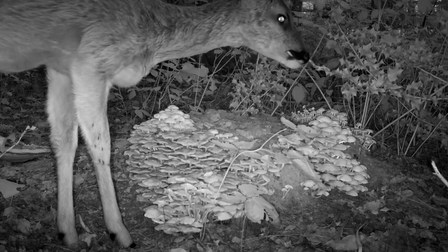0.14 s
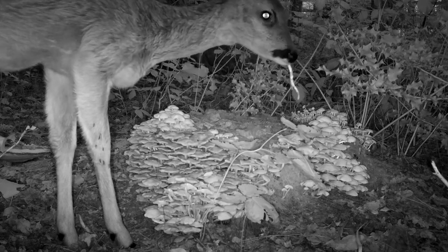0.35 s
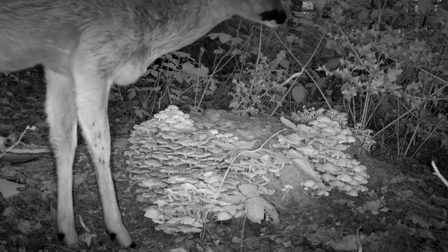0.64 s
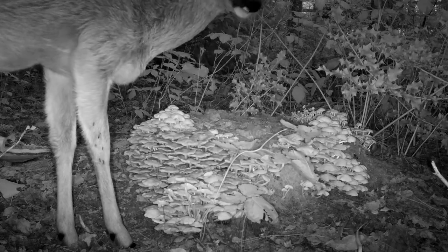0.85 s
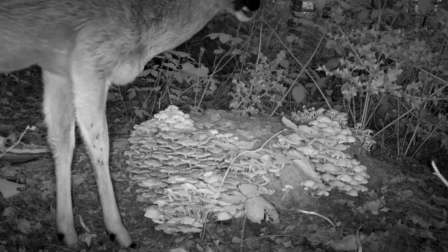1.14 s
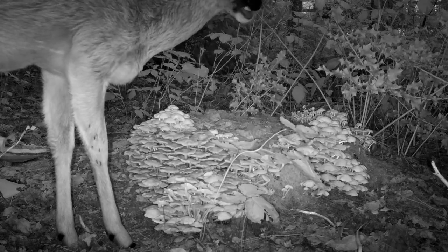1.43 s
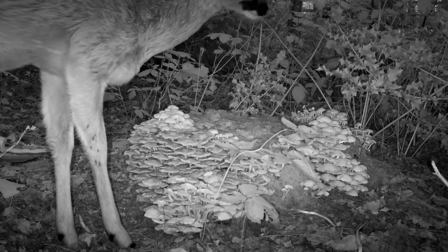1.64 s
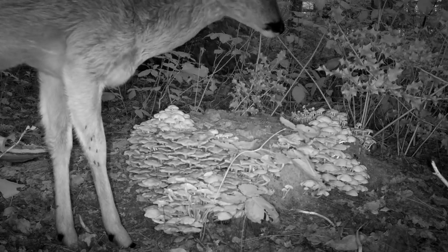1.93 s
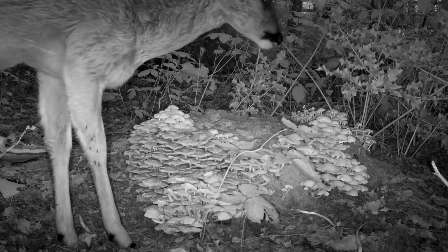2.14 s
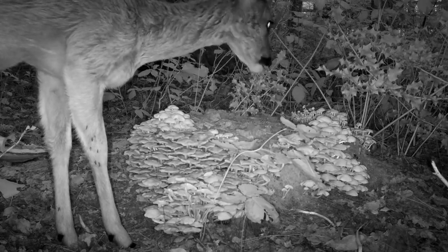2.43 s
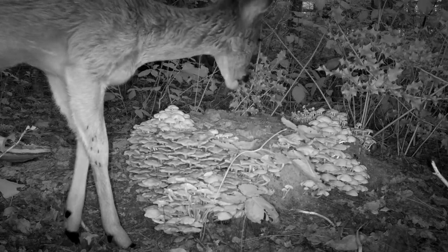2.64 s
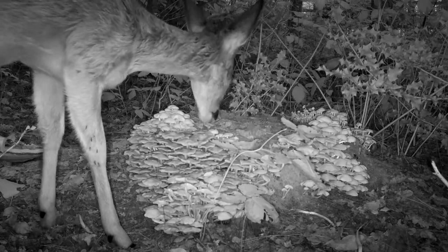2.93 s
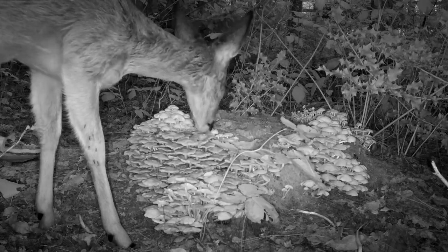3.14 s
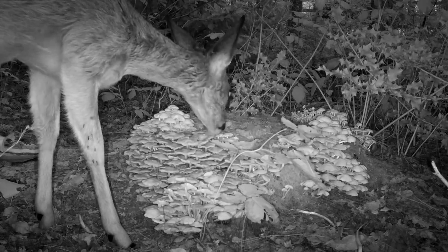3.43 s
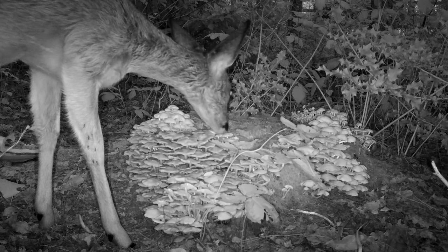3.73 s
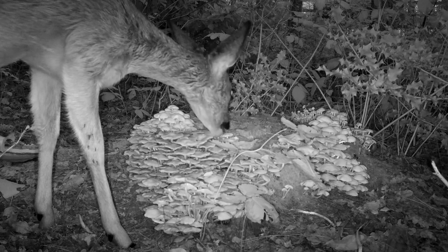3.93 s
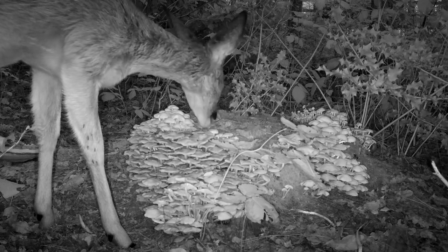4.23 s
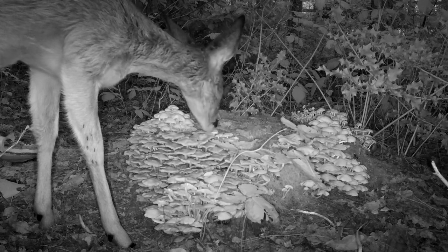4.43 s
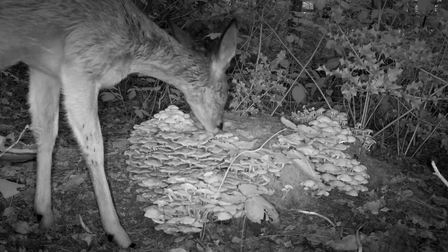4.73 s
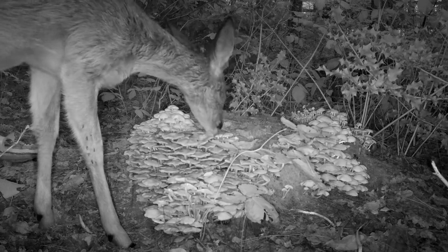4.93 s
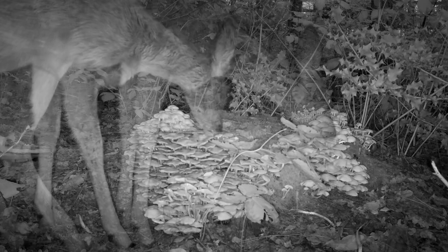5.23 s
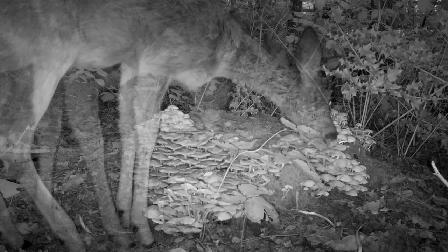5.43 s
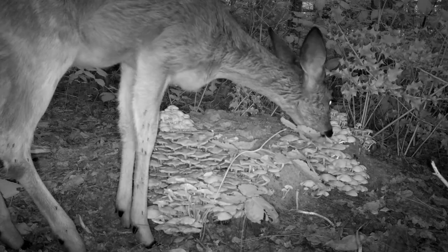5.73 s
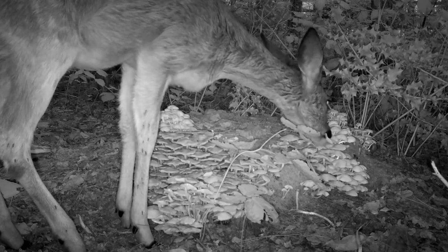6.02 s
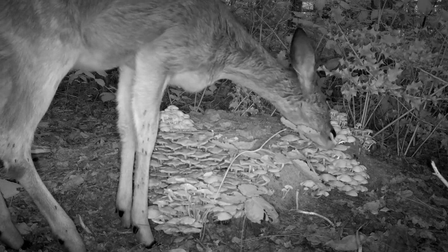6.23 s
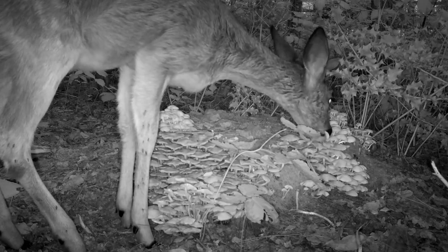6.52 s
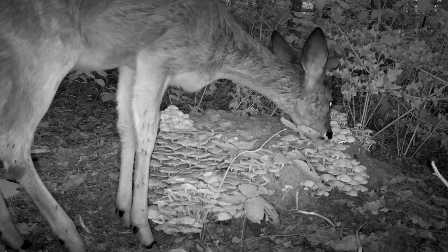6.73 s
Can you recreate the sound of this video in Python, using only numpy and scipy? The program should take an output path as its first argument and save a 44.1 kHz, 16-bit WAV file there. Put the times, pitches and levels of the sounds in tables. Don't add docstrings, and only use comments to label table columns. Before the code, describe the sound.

Through a thin, nasal trail-camera microphone, a close bird rattles off quick falling chirps, with another bird's rough buzzing whistle and leaf rustle at the start. They fade by about a second into steady woodland hiss. A deer's muzzle cracks dry stems in a sharp cluster, far birds warble with echo, the hiss turns duller as the scene changes, and one more cluster of snaps comes near the end.

```python
import sys
import numpy as np
from scipy import signal
from scipy.io import wavfile
from scipy.ndimage import uniform_filter1d

SR = 44100
rng = np.random.default_rng(int(sys.argv[2]) if len(sys.argv) > 2 else 0)


def field_ratio(decibels):
    return 10 ** (np.asarray(decibels, dtype=float) / 20)


def waveform_to_disk(signal):
    frames = np.transpose(np.atleast_2d(signal))
    scaled = np.clip(frames, -1, 1) * 32767
    samples = np.round(scaled).astype(np.int16)
    wavfile.write(sys.argv[1], SR, samples)


N = 302526
TIME = np.arange(N) / SR

# freq_hz, density_db
DRY_CRACKLE = [(7600, -38), (9000, -4), (10200, -1), (11300, -5.5), (12300, -15.5), (15700, -20.5)]


def evened(x):
    return x / np.sqrt(np.mean(x ** 2) + 1e-20)


def read(points, hz):
    point_hz, level_db = np.transpose(points)
    return np.interp(np.log(hz + 1), np.log(point_hz + 1), level_db, left=-90, right=-90)


def follow(tables, column=1):
    rows = np.concatenate(tables)
    return np.interp(TIME, rows[:, 0], rows[:, column])


def add(mix, start_s, sound):
    part = mix[round(start_s * SR):][:len(sound)]
    part += sound[:len(part)]


def colour(x, points):
    log_gain = np.log(field_ratio(read(points, abs(np.fft.fftfreq(4096, 1 / SR)))))
    taps = np.fft.ifft(np.exp(np.conj(signal.hilbert(log_gain)))).real[:2048]
    return signal.oaconvolve(x, taps / np.linalg.norm(taps))[:len(x)]


def patchy(points, patchy_db, streak_db=0):
    real, imag, patches, streaks = rng.standard_normal((N // 256 + 5, 513, 4)).T
    patches = uniform_filter1d(patches, size=12, axis=0)
    patches = evened(uniform_filter1d(patches, size=12, axis=1))
    streaks = uniform_filter1d(streaks, size=2, axis=0)
    streaks = evened(uniform_filter1d(streaks, size=14, axis=1))
    spectrum_db = read(points, np.fft.rfftfreq(1024, 1 / SR))[:, None]
    field_db = spectrum_db + patchy_db * patches + streak_db * streaks
    noise = signal.istft((real + 1j * imag) * field_ratio(field_db), nperseg=1024, noverlap=768)[1]
    return evened(noise[:N])


def grains(points, per_s, spread_db):
    ticks = rng.standard_normal(N) * (rng.random(N) < per_s / SR)
    size_db = spread_db * np.minimum(rng.exponential(1, N), 4)
    return evened(colour(ticks * field_ratio(size_db), points))


def wood(x, near_db, far_db):
    # freq_hz, t60_s
    decay = [(1000, 0.68), (2500, 0.3), (4400, 0.26), (6500, 0.32)]
    hz, t, z = signal.stft(rng.standard_normal(SR), SR, nperseg=256)
    decay_hz, t60_s = np.transpose(decay)
    fade = field_ratio(-60 * t / np.interp(hz, decay_hz, t60_s)[:, None])
    tail = signal.istft(z * fade, SR, nperseg=256)[1]
    tail[:300] = 0
    early = rng.standard_normal(1500) * (rng.random(1500) < .02)
    early = early * field_ratio(-60 * np.arange(1500) / SR / 0.11)
    echoes = field_ratio(far_db) * tail / np.linalg.norm(tail)
    echoes[40:1540] += field_ratio(near_db) * early / np.linalg.norm(early)
    return x + signal.fftconvolve(x, echoes)[:N]


def sing(notes, rough, flutter_hz):
    out = np.zeros(N)
    for rows in notes:
        point_s, pitch_hz, level_db = np.transpose(rows)
        t = np.arange(point_s[0], point_s[-1], 1 / SR)
        smooth = signal.butter(2, flutter_hz, fs=SR, output="sos")
        a, b = signal.sosfilt(smooth, rng.standard_normal((2, 8000)))[:, 1000:]
        flutter = (1 + rough * (evened(a) + 1j * evened(b)))[:len(t)]
        turn = 2 * np.pi * np.cumsum(np.interp(t, point_s, pitch_hz)) / SR
        tone = evened((flutter * np.exp(1j * turn)).real)
        edges = np.clip(np.minimum(t - point_s[0], point_s[-1] - t) / .0015, 0, 1)
        add(out, point_s[0], field_ratio(np.interp(t, point_s, level_db)) * tone * edges)
    return out


def camera():
    # time_s, peak_db
    whine_level = [(0, -68.5), (4.8, -71.5), (5.1, -82.5), (5.5, -83), (6.86, -81.5)]
    # freq_hz, density_db
    low_noise = [(12, -34), (20, -3), (55, -0.5), (171, -1.5), (370, -21.5), (526, -24), (643, -16.5),
                 (900, -14), (1100, -15.5), (1430, -38.5), (2420, -120)]
    # freq_hz, density_db
    air_noise = [(4000, -20.5), (6000, 3.5), (7200, 0.5), (8600, -1.5), (10500, 0), (13000, 1), (15700, 3)]
    whine_hz, frame_hz, frame_s = 7796.24, 29.757, 1.4015
    phase = (TIME - frame_s) * frame_hz % 1
    half = 2 * phase % 1
    field = np.where(phase < .5, 1, -.6) * field_ratio(-3.0 * half)
    whine = uniform_filter1d(field, size=60) * np.cos(2 * np.pi * whine_hz * TIME - 0.6 * half)
    overtone = field_ratio(-101) * np.cos(4 * np.pi * whine_hz * TIME)
    lines = field_ratio(follow([whine_level])) * whine + overtone
    noise = field_ratio(-74.5) * patchy(low_noise, 1.5) + field_ratio(-87.5) * patchy(air_noise, 0.86, 2.5)
    hum = patchy([(40, -20), (50, -3), (60, 0), (68, -25)], 1.2)
    return lines + field_ratio(-81.5) * hum + noise


def hiss():
    # time_s, level_db
    hiss_level = [
        [(1.1, -53), (1.2, -54.5), (1.8, -55.5), (3.32, -54), (3.83, -55.5), (4.24, -55.5), (4.64, -57),
         (4.82, -56)],
        [(4.83, -66), (5.07, -60), (5.27, -58.5), (6.62, -58.5), (6.74, -58), (6.86, -64.5)],
    ]
    # freq_hz, density_db
    clear_spectrum = [(290, -83.5), (500, -49.5), (635, -21), (806, -26), (1230, -3.5), (1790, 2),
                      (2830, -2), (3870, -11), (4480, -16.5), (4870, -19), (5990, -29), (7790, -74),
                      (13200, -120)]
    # freq_hz, density_db
    dull_spectrum = [(290, -76), (500, -59.5), (1330, -13.5), (1490, -11), (1720, -8.5), (2210, -7.5),
                     (2640, -12), (4970, -28), (5990, -39.5), (7790, -71), (13200, -120)]
    change_s = 4.822
    before, after = patchy(clear_spectrum, 1.5, 0.72), patchy(dull_spectrum, 2.04, 3.9)
    return field_ratio(follow(hiss_level) + 1.0) * np.where(TIME < change_s, before, after)


def far_birds():
    # time_s, pitch_hz, level_db
    high_notes = [
        [(3.69, 3660, -61), (3.72, 3610, -57), (3.745, 3820, -55), (3.765, 4320, -66), (3.78, 4350, -60)],
        [(3.718, 2650, -60), (3.725, 2960, -54), (3.732, 3250, -61)],
        [(3.9, 3590, -53), (3.915, 4030, -58), (3.948, 3976, -49), (3.958, 3750, -46.5), (3.99, 4070, -69)],
        [(4.115, 3570, -59), (4.138, 3600, -46.5), (4.148, 3590, -54), (4.156, 3260, -50)],
        [(4.174, 4000, -44), (4.179, 3794, -35), (4.187, 3806, -34), (4.193, 4020, -48.5)],
        [(4.194, 3460, -44), (4.2, 3780, -46), (4.209, 3880, -44), (4.228, 3890, -52)],
        [(4.232, 4050, -38.5), (4.238, 3440, -35.5), (4.25, 3420, -44), (4.263, 3410, -45)],
        [(4.265, 4050, -46), (4.278, 3655, -52), (4.29, 3310, -37)],
        [(6.74, 3720, -66), (6.76, 3650, -64), (6.8, 3720, -69)],
        [(1.195, 3470, -53), (1.22, 3520, -67), (1.232, 3660, -47.5), (1.242, 3400, -53)],
    ]
    # time_s, pitch_hz, level_db
    low_notes = [
        [(4.285, 3300, -48.5), (4.293, 3317, -37), (4.321, 3055, -54.5), (4.33, 3157, -59)],
        [(4.33, 3290, -45), (4.34, 2965, -42.5), (4.385, 2880, -62)],
    ]
    # time_s, pitch_hz, level_db
    churr_notes = [
        [(4.248, 2600, -67), (4.256, 2590, -46.5), (4.266, 2559, -53), (4.275, 2555, -66)],
        [(4.298, 2476, -47.5), (4.31, 2470, -49), (4.322, 2472, -61)],
        [(4.355, 2588, -51), (4.367, 2558, -59), (4.399, 2632, -64), (4.429, 2546, -57.5), (4.475, 2664, -60)],
    ]
    # time_s, pitch_hz, level_db
    thin_notes = [
        [(3.36, 7130, -86), (3.42, 7120, -82), (3.465, 7130, -86)],
        [(3.65, 7150, -86), (3.7, 7170, -82), (3.755, 7100, -87)],
        [(3.885, 7130, -86), (3.95, 7100, -77), (3.99, 7080, -85)],
    ]
    warbles = sing(high_notes + low_notes + churr_notes, .35, 190)
    return wood(warbles + sing(thin_notes, 0.24, 60), -20.5, -4)


def leaves():
    # time_s, rustle_db, crackle_db
    motion = [
        [(0.03, -31.5, -69), (0.118, -64, -68.5), (0.132, -28, -73), (0.162, -51.5, -69), (0.238, -41, -80),
         (0.254, -40, -68.5), (0.278, -47, -76), (0.488, -61, -84.5), (0.55, -45, -72), (0.588, -71, -84),
         (0.596, -76, -84), (1.0, -67, -87)],
        [(1.02, -67, -86), (1.23, -70, -88.5), (1.27, -62.5, -76), (1.34, -64.5, -88), (1.52, -80, -101),
         (1.66, -69, -82), (1.67, -57.5, -108), (1.69, -68, -90), (1.93, -71, -101), (1.94, -63.5, -109),
         (2.07, -68, -93), (2.12, -66, -109), (2.15, -68, -94), (2.37, -72, -95), (2.39, -74, -109),
         (2.46, -90, -90), (2.57, -67, -109), (2.62, -76, -91), (2.73, -81, -96), (2.85, -49.5, -70),
         (2.87, -68, -81), (3.02, -84, -102), (3.09, -36.5, -65), (3.12, -54, -91), (3.24, -75, -87),
         (3.41, -78, -94), (3.46, -82, -109), (3.49, -75, -98), (3.93, -87, -99), (3.99, -64, -108),
         (4.03, -57, -90), (4.09, -64, -87), (4.38, -72, -87), (4.58, -76, -100), (4.66, -59.5, -79),
         (4.69, -56.5, -74), (4.74, -58.5, -80), (4.82, -69, -92)],
        [(4.83, -83, -102), (5.02, -92, -108), (5.1, -64, -94), (5.34, -94, -99), (5.37, -66, -89),
         (5.44, -68.5, -108), (5.45, -82, -103), (5.9, -79, -102), (5.94, -69, -91), (6.03, -96, -99),
         (6.24, -80.5, -93), (6.35, -97, -109), (6.43, -76, -92), (6.48, -75, -100), (6.54, -58, -80),
         (6.56, -58, -88), (6.59, -52, -82), (6.59, -66, -81), (6.6, -35, -84), (6.63, -74, -95),
         (6.77, -67.5, -97), (6.86, -87, -102)],
    ]
    # freq_hz, density_db
    rustle_spectrum = [(1500, -12), (2800, -15.5), (4200, -2.5), (5300, -5.5), (6500, -24.5), (7800, -27.5)]
    rustle = field_ratio(follow(motion) - 1.5) * grains(rustle_spectrum, 6800, 2.9)
    return rustle + field_ratio(follow(motion, column=2)) * grains(DRY_CRACKLE, 5031, 2.2)


def cracks():
    # start_s, peak_db, body_hz, treble_rel_db, t60_s
    snaps = [(1.147, -50, 4900, -22.5, 0.01), (1.278, -58, 3550, 7, 0.0059),
             (2.776, -36.5, 4050, -32, 0.0055), (2.808, -49, 4350, -22, .004),
             (2.853, -46, 4000, -20, .004), (3.0728, -29, 3500, -24, .004), (3.083, -36, 3000, -10, .005),
             (3.0877, -22, 3300, -21, .006), (3.0908, -23, 3000, -24, .003), (3.0924, -25, 3500, -14, .003),
             (3.0948, -30, 4000, -17, .007), (3.104, -45, 3800, -14, .008), (3.197, -36, 3900, -26, 0.0016),
             (4.685, -40, 3000, -9, 0.0069), (4.695, -41.5, 3000, -14, 0.0054),
             (5.0998, -43, 4000, -34, 0.0061), (5.938, -57, 5300, -36, .015),
             (6.435, -55.5, 5200, -34, 0.017), (6.509, -42, 4200, -22, 0.0023),
             (6.529, -36, 4000, -38, 0.0017), (6.5355, -45, 4200, -24, .003), (6.539, -33, 4200, -24, .006),
             (6.547, -46, 4200, -24, .003), (6.579, -37, 3700, -30, .003), (6.584, -28, 4700, -28, .004),
             (6.598, -29, 2500, -34, .006), (6.6043, -20, 3600, -32, .002), (6.6062, -28, 2900, -30, .008),
             (6.6095, -30, 2700, -30, .006), (6.607, -37.5, 1800, -43, 0.016)]
    out, t = np.zeros(N), np.arange(900) / SR
    for start_s, peak_db, body_hz, treble_db, t60_s in snaps:
        snap = rng.standard_normal(900) * field_ratio(-60 * t / max(t60_s, .0015))
        body = colour(snap, [(900, -50), (body_hz / 1.5, -9), (body_hz, 0), (body_hz * 1.3, -9), (7800, -42)])
        tick = colour(snap, DRY_CRACKLE)
        both = body / abs(body).max() + field_ratio(treble_db) * tick / abs(tick).max()
        add(out, start_s - .0003, field_ratio(peak_db) * both)
    return out


def chatter():
    # time_s, centre_hz, level_db
    path = [(0, 4340, -33), (.15, 4240, -34.5), (.25, 3940, -36), (.33, 3660, -35.5), (.42, 3570, -37.5),
            (.52, 3100, -39.5), (.62, 2720, -41.5), (.72, 2696, -48), (.85, 2670, -49), (1.0, 2540, -56),
            (1.15, 2550, -76), (1.3, 2550, -79)]
    width_hz = 1000
    turn = np.exp(2j * np.pi * np.cumsum(follow([path])) / SR)
    r = np.exp(-np.pi * width_hz / SR)
    noise = rng.standard_normal(N)
    lumps = noise * field_ratio(2.0 * evened(uniform_filter1d(rng.standard_normal(N), size=200)))
    band = (turn * signal.lfilter([1], np.convolve([1, -r], [1, -r]), lumps / turn)).real
    return field_ratio(follow([path], column=2)) * evened(band)


def buzz():
    # time_s, pitch_hz, level_db
    buzz_notes = [
        [(0, 4208, -27.5), (.012, 4340, -26), (.02, 4280, -40), (.0275, 4230, -23)],
        [(.0665, 4440, -22), (.074, 4324, -38), (.09, 4166, -37.5)],
        [(.1185, 4322, -29), (.128, 4313, -26), (.136, 4386, -31), (.139, 4370, -35.5)],
        [(.18, 4653, -40), (.192, 4284, -28.5), (.2, 3564, -36.5), (.205, 3300, -12.5)],
        [(.238, 4810, -33.5), (.245, 4653, -25.5), (.249, 4053, -23.5), (.256, 3450, -32)],
        [(.512, 3394, -42.5), (.522, 3285, -36.5), (.53, 2750, -26.5)],
    ]
    return sing(buzz_notes, .35, 350)


def rattle():
    # start_s, length_s, top_hz, bottom_hz, peak_db, overtone_db
    chirp_rows = [(0.0, 0.014, 2950, 1464, -20, -1.5), (0.068, 0.017, 3903, 1390, -24, -5.5),
                  (0.12, 0.023, 3075, 1439, -25.5, -10), (0.194, .018, 3270, 1400, -25, -7.5),
                  (0.245, 0.024, 3070, 1406, -24, -10), (0.329, .019, 3208, 1562, -25.5, -10),
                  (.390, .023, 3680, 1430, -22, -20.5), (0.453, 0.014, 3644, 1560, -22, -18),
                  (.532, 0.015, 2843, 1630, -23, -19), (.609, 0.017, 2830, 1523, -26.5, -34),
                  (0.727, 0.016, 2635, 1490, -35, -18.5), (0.792, 0.022, 3040, 1382, -31.5, -22),
                  (0.878, 0.022, 2795, 1737, -24.5, -28), (0.981, 0.018, 2727, 1826, -21.5, -30.5),
                  (1.237, 0.023, 2310, 1850, -42.5, -24)]
    out = np.zeros(N)
    for start_s, length_s, top_hz, bottom_hz, peak_db, overtone_db in chirp_rows:
        u = np.linspace(0, 1, round(length_s * SR))
        fall = .5 * u + .5 * (.5 - .5 * np.cos(np.pi * u))
        pitch_hz = top_hz + (bottom_hz - top_hz) * fall ** (bottom_hz / 1500)
        turn = 2 * np.pi * np.cumsum(pitch_hz) / SR
        rise = np.sin(np.pi * u) ** (1.5 * (bottom_hz / 1500) ** 2)
        overtone = field_ratio(overtone_db) * rise * np.sin(2 * turn)
        add(out, start_s, field_ratio(peak_db) * rise * (np.sin(turn) + overtone))
    add(out, .0032, field_ratio(-6) * out.copy())
    return out


def near_birds():
    # freq_hz, gain_db
    response = [(300, -50), (1000, -22), (1500, -6), (2200, 0), (4500, 0), (5600, -6), (7000, -18),
                (16000, -23)]
    buzzing = buzz()
    chirps, moved = rattle(), TIME > .7
    perches = wood(chirps * ~moved, -9, -8) + wood(chirps * moved, -13, -11)
    near = perches + wood(buzzing, -9, -10) + chatter()
    return field_ratio(-6) * colour(near, response)


def scene():
    birds = near_birds() + far_birds()
    deer = wood(cracks(), -9, -10) + leaves()
    opening_click = field_ratio(-19.5) * (TIME < 2 / SR)
    return (birds + deer + hiss() + camera() + opening_click)[None]


def drop_weak(x):
    # centre_s, length_s, threshold_db
    starved = [(0.578, .02, -100), (0.72, .015, -100), (1.31, 0.013, -104), (1.673, .012, -104),
               (1.718, 0.01, -104), (1.962, 0.032, -88), (2.11, .024, -91), (2.403, 0.022, -100),
               (2.589, 0.04, -92.5), (2.964, .012, -102), (3.009, .012, -102), (3.228, .012, -102),
               (3.458, .03, -98), (3.765, 0.013, -100), (3.91, .015, -100), (3.989, 0.036, -93),
               (4.948, 0.038, -96.5), (5.434, .015, -104), (6.005, .015, -104), (6.045, 0.012, -104),
               (6.335, 0.019, -100), (6.385, 0.011, -103), (6.498, 0.017, -103)]
    hz, t, z = signal.stft(x, SR, nperseg=1024, noverlap=896)
    strength = uniform_filter1d(abs(z), size=5)
    for centre_s, length_s, threshold_db in starved:
        inside = np.clip((length_s / 2 + .008 - abs(t - centre_s)) / .004, 0, 1)
        z = z * np.where(strength < field_ratio(threshold_db + 4), field_ratio(-22 * inside), 1)
    return signal.istft(z, SR, nperseg=1024, noverlap=896)[1][:, :N]


def low_pass(x):
    return signal.sosfilt(signal.butter(12, 15720, fs=SR, output="sos"), x)


def record(dry):
    mix = drop_weak(dry)
    return low_pass(mix)


dry = scene()
out = record(dry)
waveform_to_disk(out)
```